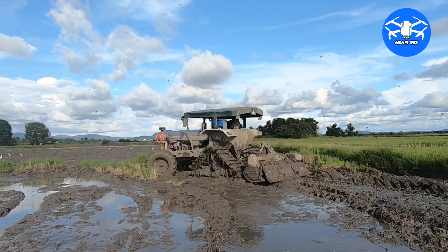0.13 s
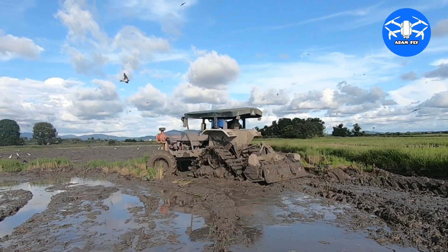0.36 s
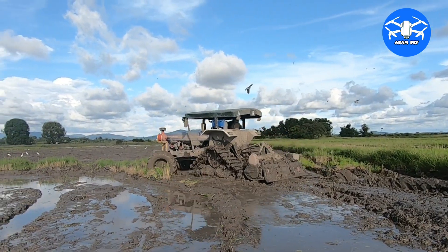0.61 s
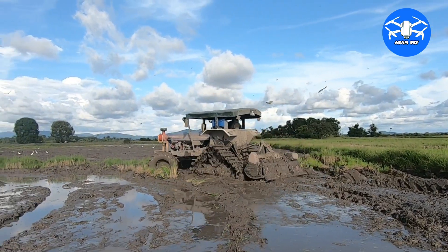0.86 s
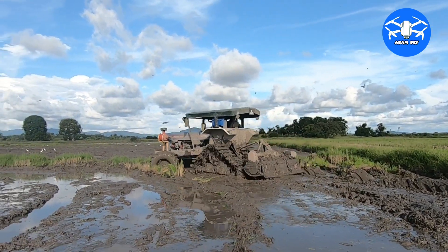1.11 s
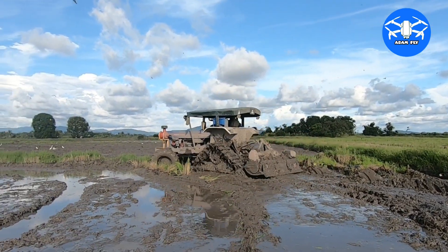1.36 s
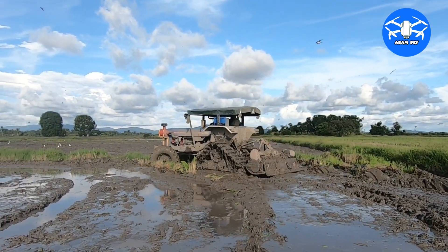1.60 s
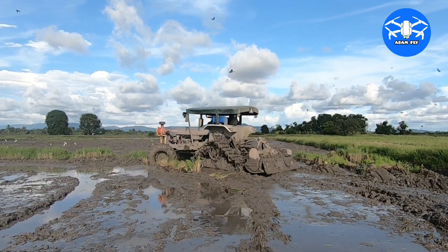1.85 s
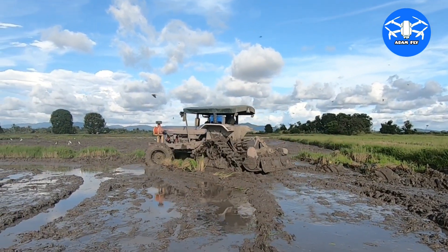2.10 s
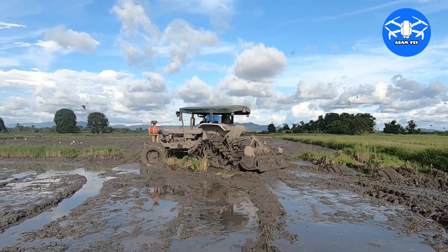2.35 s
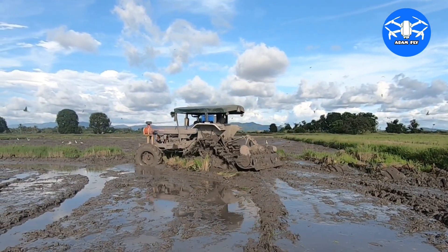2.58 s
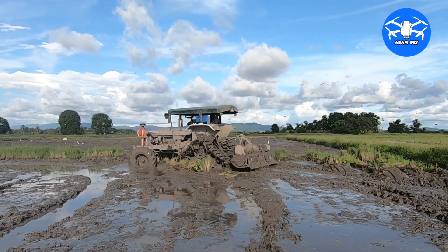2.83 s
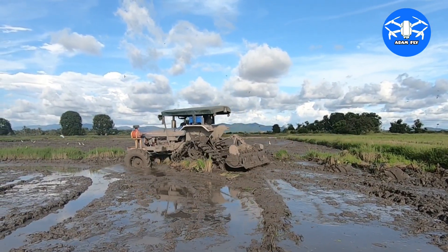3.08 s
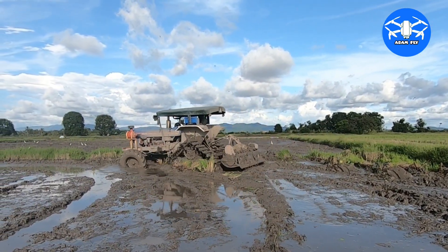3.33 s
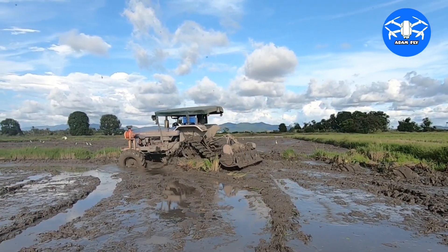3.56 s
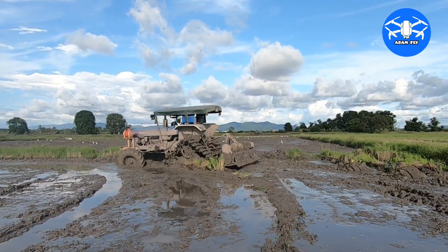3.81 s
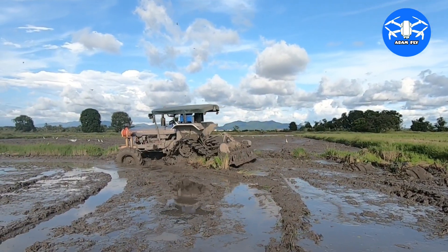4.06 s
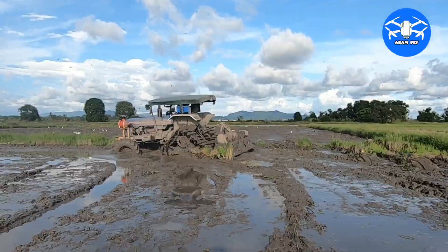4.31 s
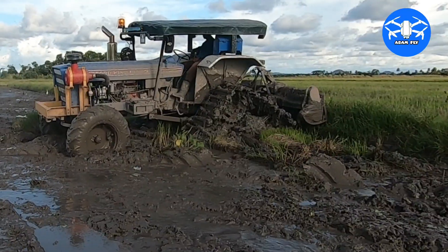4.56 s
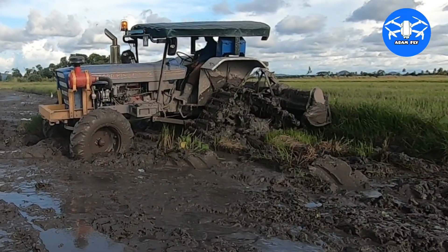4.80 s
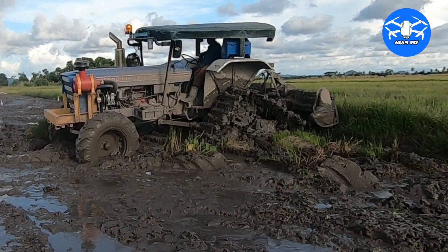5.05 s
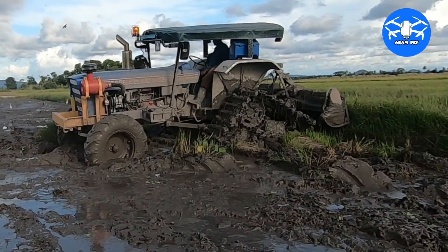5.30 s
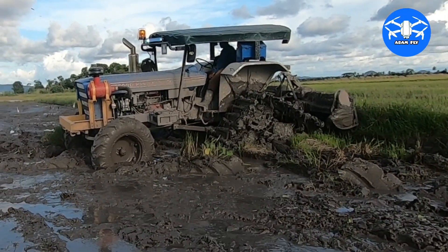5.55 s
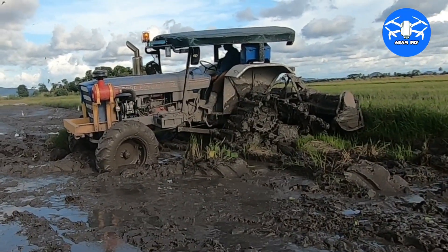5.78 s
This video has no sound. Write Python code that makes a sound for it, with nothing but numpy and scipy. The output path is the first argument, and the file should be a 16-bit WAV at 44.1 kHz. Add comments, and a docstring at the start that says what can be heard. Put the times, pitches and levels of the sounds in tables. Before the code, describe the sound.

Steady loaded diesel hum, mechanical clatter and faint gear whine outdoors, one early knock, a short silence, then a slower, deeper engine.

```python
"""A six-cylinder diesel tractor drags a rotary tiller through a flooded field, in two shots.
Exhaust partials hum at the firing rate, blade partials throb below; a noise burst at each firing clatters.
Gear tones sing at times and filtered noise makes wind and churned mud. Early on a knock rings the camera
body; the wide microphone pair then fades to a centred pickup and later creeps back.
After a short silence the second shot has a slower engine, the centred pickup and slowly opening treble."""
import sys
import numpy as np
from scipy import signal
from scipy.fft import rfft, irfft, next_fast_len
from scipy.io import wavfile

SR = 44100
rng = np.random.default_rng(int(sys.argv[2]) if len(sys.argv) > 2 else 0)


def natural_amplitude(level_db):
    """Convert a level in decibels to a linear amplitude factor, elementwise."""
    exponent = np.asarray(level_db, float) / 20
    return 10 ** exponent


def materialize(psi):
    """Save the field psi as 16-bit PCM at rate SR to the path in sys.argv[1].

    A 1-D psi becomes a single channel; in a 2-D psi each row is a channel.
    """
    bounded = np.clip(np.atleast_2d(psi).T, -1, 1)
    quanta = np.round(bounded * 32767).astype(np.int16)
    wavfile.write(sys.argv[1], SR, quanta)


N = 260625
T = np.arange(N) / SR
SIZE = next_fast_len(N + 4096)
HZ = np.maximum(np.arange(SIZE // 2 + 1) * SR / SIZE, 1)
# limits of the shots: (start [s], fade-in [s], end [s])
SHOTS = [(-1, .01, 4.372), (4.538, .072, 7)]


def in_time(rows):
    """Linear interpolation turns table columns into signals, sample by sample."""
    s, *columns = np.transpose(rows)
    return [np.interp(T, s, c) for c in columns]


def in_hz(rows):
    """Interpolation on a log-frequency axis turns table columns into spectra, bin by bin."""
    hz, *columns = np.transpose(rows)
    return [np.interp(np.log(HZ), np.log(hz), c) for c in columns]


def shape(x, response):
    """Linear filtering: the spectrum is multiplied by a frequency response."""
    return irfft(rfft(x, SIZE) * response, SIZE)[..., :N]


def rms_one(x):
    """Normalisation to unit rms."""
    return x / np.sqrt(np.mean(x ** 2) + 1e-20)


def drift(rate):
    """Slow random wandering of spread 1: white noise through two equal poles at rate [Hz]."""
    pole = np.exp(-2 * np.pi * rate * 64 / SR)  # one step is 64 samples
    white = rng.standard_normal(N // 64 + 2002)
    slow = signal.lfilter([1], [1, -2 * pole, pole * pole], white)[2000:]
    return np.interp(np.arange(N) / 64, np.arange(len(slow)), rms_one(slow - slow.mean()))


def bells(rows):
    """Gaussian envelopes, each two standard deviations per length, with their dB."""
    return [(np.exp(-(2 * (T - s) / length) ** 2 / 2), db) for s, length, db in rows]


def swells(rows):
    """Bell-shaped changes of level, summed in dB."""
    return sum(db * bell for bell, db in bells(rows))


def partials(turns, orders, waver_db, waver_rad, rate):
    """Harmonic synthesis: sines on multiples of a shaft angle, wavering in level and phase."""
    total = 0
    for multiple, db in orders:
        level = np.sqrt(2) * natural_amplitude(db + waver_db * drift(rate))
        angle = 2 * np.pi * (multiple * turns + rng.random())
        total = total + level * np.sin(angle + waver_rad * drift(rate))
    return total


def lumpy(spectrum, level_db, lump_db, rate):
    """Filtered noise whose level wanders randomly; two unrelated draws."""
    lumps = natural_amplitude(lump_db * drift(rate))
    noise = shape(rng.standard_normal((2, N)), natural_amplitude(in_hz(spectrum)[0]))
    return natural_amplitude(level_db) * lumps * rms_one(noise)


def wide_share():
    """Crossfade law of the wide pair: decay linear in dB, then exponential return towards full share."""
    full_share = .85
    leave_s, leave_db_per_s = .75, 36
    return_s, return_tau_s = 3.206, .92
    leaving = natural_amplitude(-leave_db_per_s * np.maximum(T - leave_s, 0))
    returning = 1 - np.exp(-np.maximum(T - return_s, 0) / return_tau_s)
    return full_share * np.maximum(leaving, returning) * (T < SHOTS[0][2])


def wind(level_db):
    """Turbulent pressure on the microphones: low-frequency noise that swells in gusts."""
    # wind colour: (frequency [Hz], level per Hz [dB])
    wind_colour = [(10, -1.5), (30, 8), (50, 6), (75, 6), (110, -20.5), (200, -69.5)]
    # gusts: (centre [s], length [s], level over the calm [dB])
    gusts = [(1.05, 0.14, 5), (3.0, .25, 5.5), (3.75, .2, 1), (4.15, 0.15, 9.5), (4.66, 0.057, 9)]
    return lumpy(wind_colour, level_db + swells(gusts), lump_db=3.0, rate=13)


def thumps():
    """Wind buffets on the microphone port: short Gaussian bursts of low-frequency noise."""
    # buffet colour: (frequency [Hz], level per Hz [dB])
    buffet_colour = [(12, -8), (25, 0), (42, 0), (60, -14), (90, -40), (300, -100)]
    # buffets: (centre [s], length [s], level [dB])
    buffets = [(1.514, 0.029, -28.5), (2.328, 0.052, -29), (5.536, 0.066, -31)]
    envelope = sum(natural_amplitude(db) * bell for bell, db in bells(buffets))
    return envelope * lumpy(buffet_colour, 0, lump_db=1.0, rate=8)


def knock():
    """Impact on the camera body: damped modes, louder on the left, with a soft contact."""
    knock_s, contact_s = .6247, .0007
    # body modes: (frequency [Hz], 60 dB decay [s], left level [dB], right level [dB], right sign)
    body_modes = [(100, .062, -3, -18, 1), (700, .011, -6.5, -10, -1), (2150, .007, -13.5, -15.5, 1)]
    t = np.maximum(T - knock_s, 0)
    rings = 0
    for hz, t60, left, right, sign in body_modes:
        decay = natural_amplitude(np.array([[left], [right]]) - 60 * t / t60)
        rings = rings - decay * np.sin(2 * np.pi * hz * t) * [[1], [sign]]
    return rings * (1 - np.exp(-(t / contact_s) ** 2))


def rumble(k, level_db):
    """Turbulence of exhaust flow and churned mud: low-frequency noise in lumps."""
    # rumble colour, one table a shot: (frequency [Hz], level per Hz [dB])
    rumble_colour = [
        [(40, 3.5), (70, 5.5), (130, 6), (220, 0.5), (330, -13.5), (500, -43.5)],
        [(40, -15), (70, 2), (130, 20.5), (160, 3.5), (300, -10), (500, -41)],
    ]
    # the mud churns less or more: (centre [s], length [s], change [dB])
    churns = [(1.0, 0.31, -6.5), (3.8, 0.19, 0), (5.55, 1, 1.5)]
    level_db = level_db + 2.5 * wide_share() + swells(churns)  # 2.5 dB per unit share of the wide pair
    return lumpy(rumble_colour[k], level_db, lump_db=2.5, rate=32)


def gears(k, turns):
    """Gear meshing: one tone at the tooth rate, switched softly while the teeth are pressed."""
    # tooth rate, one value a shot [multiple of the engine cycle]
    tooth_order = [42, 56]
    # spells of whine: (start [s], end [s], level [dB])
    whines = [(-.2, 1.4, -43), (1.4, 2.04, -39.5), (2.3, 2.42, -47), (2.77, 3.0, -46), (3.0, 3.25, -51),
              (3.25, 3.43, -41), (3.43, 4.15, -49), (4.85, 6.1, -50.5)]
    edge_s = .03
    on = 0
    for start, end, db in whines:
        on = on + natural_amplitude(db) * (np.tanh((T - start) / edge_s) - np.tanh((T - end) / edge_s)) / 2
    return on * partials(turns, [(tooth_order[k], 0)], waver_db=2, waver_rad=.2, rate=6)


def clatter(k, turns, treble_db, rattle_db):
    """Impulsive excitation: each firing gives a decaying noise burst, coloured by filtering."""
    # clatter colour, one table a shot: (frequency [Hz], level per Hz [dB])
    clatter_colour = [
        [(150, -8.5), (250, -1), (347, -4), (635, -1.5), (995, -4), (1270, -4), (1510, -10), (2060, -9),
         (2850, -13), (3510, -18), (4240, -23), (7640, -35), (9890, -37), (13300, -42), (15500, -35)],
        [(150, -33.5), (250, -7.5), (378, -3.5), (458, -7), (755, -3), (867, -6), (1360, -1), (1640, -11.5),
         (1920, -2.5), (2160, -13.5), (3160, -14.5), (4630, -26), (9890, -38), (12800, -45), (15500, -69)],
    ]
    # peaks and dips of the clatter's colour, one table a shot:
    # (frequency [Hz], width [Hz], level change [dB])
    colour_bumps = [
        [(680, 250, 2.5), (1332, 210, 7), (995, 155, -6), (1650, 110, 1), (2053, 350, 6), (2884, 220, -5),
         (3610, 360, 3), (10000, 570, 6)],
        [(645, 180, 6.5), (974, 69, 4.5), (1310, 250, 3.5), (1650, 150, 1.5), (2100, 480, 1.5),
         (2330, 200, 2.5), (3400, 1600, 3.5), (9700, 1300, 0.5)],
    ]
    # knock strength of each cylinder: (level [dB])
    cylinder_db = [-7, -3.5, -7.5, -34, -3, -16]
    # clatter level: (time [s], level [dB])
    clatter_level = [(0, -37.5), (.5, -37.5), (.75, -41), (1.0, -40), (1.6, -36.5), (2.1, -36.5),
                     (3.0, -37), (3.7, -36.8), (4.0, -38), (4.6, -38.5), (4.9, -37.5), (5.3, -37),
                     (5.91, -35.5)]
    # the panel rattles harder or softer: (centre [s], length [s], change [1.1 dB])
    rattles = [(3.4, 0.96, 3.5), (4.65, 0.19, -7), (5.45, 0.23, 2.5)]
    # one change of the hiss near 9.6 kHz: (centre [s], length [s], change [dB])
    jet_swell = (4.1, 0.83, 3.4)

    firing = 6 * turns
    count = firing.astype(int)
    phase = firing - count
    chance = np.clip(rng.standard_normal(count[-1] + 1), -2, 2)
    strength = natural_amplitude(np.array(cylinder_db)[count % 6] + 3.5 * chance[count])
    burst = 1.03 + strength * np.exp(-3.0 * phase) * (1 - np.exp(-30 * phase))

    colour = in_hz(clatter_colour[k])[0]
    for hz, width, db in colour_bumps[k]:
        colour = colour + db / (1 + (2 * (HZ - hz) / width) ** 2)
    noise = shape(burst * rng.standard_normal((2, N)), natural_amplitude(colour))  # two unrelated draws
    noise = noise / np.sqrt(np.mean(shape(noise, (HZ > 700) & (HZ < 4000)) ** 2))

    panel = shape(noise, 1 / (1 + ((HZ - 1320) / 130) ** 4))
    noise = noise + (natural_amplitude(1.1 * (rattle_db + swells(rattles))) - 1) * panel
    jet = shape(noise, 1 / (1 + ((HZ - 9600) / 1100) ** 2))
    noise = noise + (natural_amplitude(swells([jet_swell])) - 1) * jet

    above_4800 = shape(noise, 1 / (1 + (4800 / HZ) ** 6))
    above_7000 = shape(noise, 1 / (1 + (7000 / HZ) ** 6))
    above_10500 = shape(noise, 1 / (1 + (10500 / HZ) ** 16))
    above_12500 = shape(noise, 1 / (1 + (12500 / HZ) ** 16))
    # top level: steady in the first shot, opening by 23 dB/s until 5.7 s in the second
    top_db = [-9.5, 2 - 23 * np.clip(5.7 - T, 0, 2)][k]
    dips = np.clip(drift(40) - .8, 0, .8)  # the treble dips briefly, deeper towards the top
    upper = natural_amplitude(.45 * top_db + 6.5) * (above_10500 - above_12500) + natural_amplitude(top_db) * above_12500
    bright = natural_amplitude(-16 * dips) * (above_7000 - above_10500 + upper)
    treble = natural_amplitude(-9 * dips) * (above_4800 - above_7000) + bright
    lower = natural_amplitude(0.53 * drift(3.5)) * (noise - above_4800)
    treble_db = treble_db + 5.5 * wide_share()  # 5.5 dB per unit share of the wide pair
    return natural_amplitude(in_time(clatter_level)[0]) * (lower + natural_amplitude(treble_db + 20.5) * treble)


def tiller(k, level_db):
    """Periodic blade strikes: a low harmonic series on the throb rate."""
    # tiller speed, one table a shot: (time [s], blade throbs [1/s])
    throb = [
        [(0, 56.2), (.6, 55.3), (1.4, 55.8), (1.7, 55.1), (2.1, 53.8), (2.5, 53.6), (3, 52.9), (3.8, 53.7),
         (4.4, 53.7)],
        [(4.6, 56.9), (5.5, 56.8), (5.91, 56.1)],
    ]
    # blade partials, one table a shot: (multiple of the throb rate, level [dB])
    blade_orders = [
        [(.5, -21), (1, -0.5), (2, -10.5), (4, -22)],
        [(.5, -9.5), (1, -2), (2, -9), (4, -30.5)],
    ]
    turns = np.cumsum(in_time(throb[k])[0]) / SR
    return natural_amplitude(level_db) * partials(turns, blade_orders[k], waver_db=2, waver_rad=0.1, rate=3)


def engine_cycles(k):
    """Phase as the integral of rate: engine cycles turned, at six firings a cycle."""
    # engine speed, one table a shot: (time [s], firings [1/s])
    speed = [
        [(0, 89.7), (.5, 90.1), (.85, 89.85), (1.1, 90.2), (1.4, 91.2), (1.7, 90), (1.9, 89.85), (2.2, 90.2),
         (2.7, 90), (3.05, 90.9), (3.5, 90.6), (4.4, 90.75)],
        [(4.6, 81.3), (5, 82.2), (5.4, 82.45), (5.91, 82.2)],
    ]
    return np.cumsum(in_time(speed[k])[0] / 6) / SR


def exhaust(k, turns, level_db):
    """Periodic gas pulses: a steady firing tone; partials of uneven cylinders and gears waver more."""
    # exhaust partials, one table a shot: (multiple of the engine cycle, level [dB])
    exhaust_orders = [
        [(3, -24), (4, -35.5), (5, -37.5), (6, 0.5), (7, -39.5), (9, -27.5), (10, -31.5), (12, -23),
         (18, -50.5), (20, -52.5), (27, -38.5), (30, -43), (36, -41), (50, -41), (63, -41.5), (84, -39.5),
         (93, -37.5)],
        [(3, -17), (5, -20), (6, 0.5), (7, -29), (9, -31.5), (10, -44), (12, -32.5), (14, -35.5), (19, -36.5),
         (27, -39), (69, -48), (84, -46.5), (101, -46.5)],
    ]
    # the engine stumbles: (centre [s], length [s], exhaust change [dB])
    stumbles = [(4.74, 0.071, -6.5), (5.65, 0.044, -2.5), (5.9, 0.032, -3.5)]
    firing = [o for o in exhaust_orders[k] if o[0] in (6, 12)]
    uneven = [o for o in exhaust_orders[k] if o[0] not in (6, 12)]
    main = partials(turns, firing, waver_db=0.03, waver_rad=0.05, rate=12)
    rest = partials(turns, uneven, waver_db=2.2, waver_rad=.6, rate=4)
    level_db = level_db + 0.54 * wide_share() + swells(stumbles)  # 0.54 dB per unit share of the wide pair
    return natural_amplitude(level_db) * (main + rest)


def shot(k):
    """Superposition in one view: common tones plus noise on the first signal, noise alone on the second."""
    # steady levels, one row a shot: (exhaust [dB], tiller [dB], wind [dB], rumble [dB],
    # treble [dB, before a 20.5 dB lift], panel rattle [1.1 dB])
    steady = [(-15, -28.5, -36, -34, -21, -2.5), (-16.5, -26, -40.5, -41, -18, -2.1)]
    exhaust_db, tiller_db, wind_db, rumble_db, treble_db, rattle_db = steady[k]
    turns = engine_cycles(k)
    noise = wind(wind_db) + thumps() + rumble(k, rumble_db) + clatter(k, turns, treble_db, rattle_db)
    tones = gears(k, turns) + tiller(k, tiller_db) + exhaust(k, turns, exhaust_db)
    start, fade, end = SHOTS[k]
    cut_s = .0002
    fade_in = natural_amplitude(-38 * np.clip(1 - (T - start) / fade, 0, 1) ** 1.2) * (T > start)
    gate = fade_in * np.clip((end - T) / cut_s, 0, 1)
    return gate * (noise + [[1], [0]] * tones)


def microphones(near, other):
    """Partial coherence: a centred pickup blends with a pair whose ports differ in colour and phase."""
    # wide pair against the centred pickup:
    # (frequency [Hz], left level [dB], right level [dB], left lead below 5 kHz [rad], likeness [0-1])
    pair = [(59, -19, -0.5, -1.5, 0.4), (112, -7, 2.2, -1, .99), (156, -20.5, 2.5, -0.5, .9),
            (182, -18.5, 10.5, 3.9, 0.5), (231, -14.5, 6, -1.5, .6), (240, -4.5, 12.5, 4, 1),
            (450, -2.5, 6, 2, 0.83), (680, 3.5, 7.5, 2.5, 0.95), (862, 12.5, 13, 2.5, 1),
            (1190, 3.5, -3, 2, 0.82), (1410, 8.5, 7, 1.69, .95), (2050, 4.5, -9.5, 1.5, 0.7),
            (2700, 8.5, 3.5, 5.5, 0), (3200, 3, 4, -2.3, 0.9), (5000, 2, 2, 1.5, 0), (6900, 0, 6, 0, 0.8),
            (9150, -1, 7, -10.5, 0.9), (13700, -3, -5, 1.5, 0.8)]
    left_db, right_db, lead, alike = in_hz(pair)
    alike = np.clip(alike, 0, 1)
    lead = lead * (HZ < 5000)
    left = natural_amplitude(left_db) * np.exp(.7j * lead)
    right = natural_amplitude(right_db) * np.exp(-.3j * lead)
    wide_left = shape(near, left * alike) + shape(other, left * np.sqrt(1 - alike ** 2))
    wide = np.array([wide_left, shape(near, right)])
    share = wide_share()
    return (1 - share) * near + share * wide


def scene():
    """Superposition of both shots through the microphones, and the knock."""
    near, other = shot(0) + shot(1)
    return microphones(near, other) + knock()


def top_cut(x):
    """Nothing passes above the cut-off."""
    return signal.sosfilt(signal.butter(12, 15730, fs=SR, output="sos"), x)


def record(dry):
    """Low-pass filtering: the top rolls off above 14.5 kHz."""
    low_pass = signal.butter(8, 14500, fs=SR, output="sos")
    mix = signal.sosfilt(low_pass, dry)
    return top_cut(mix)


dry = scene()
out = record(dry)
materialize(out)
```